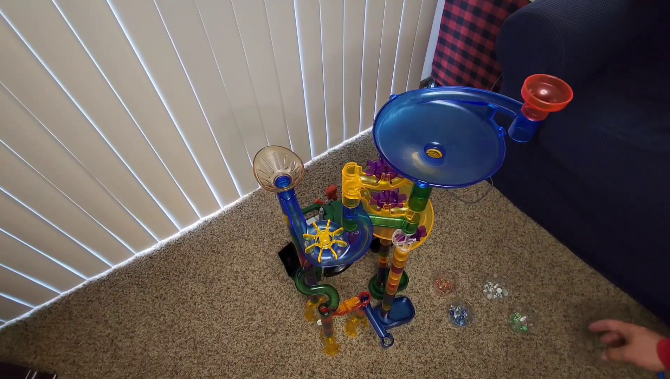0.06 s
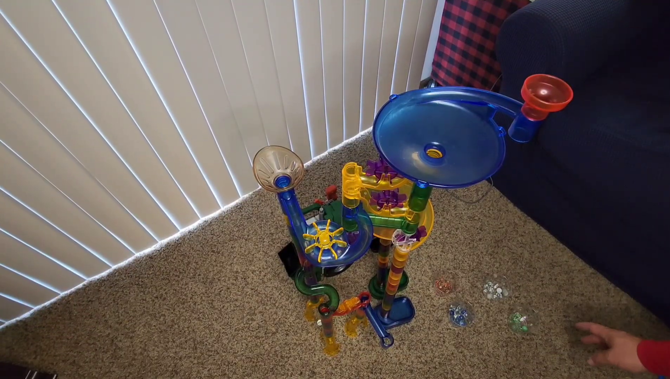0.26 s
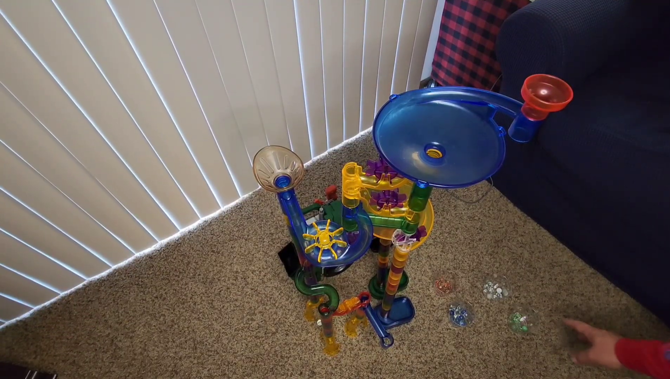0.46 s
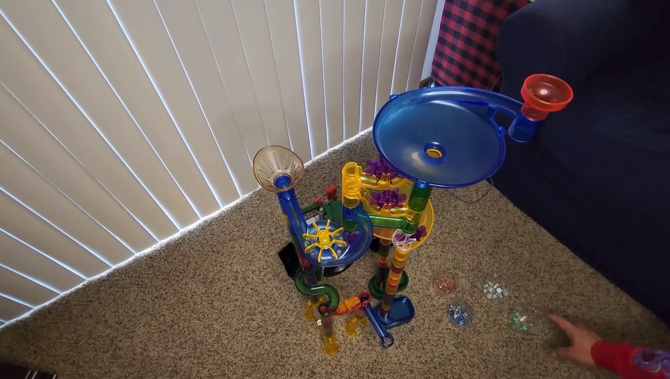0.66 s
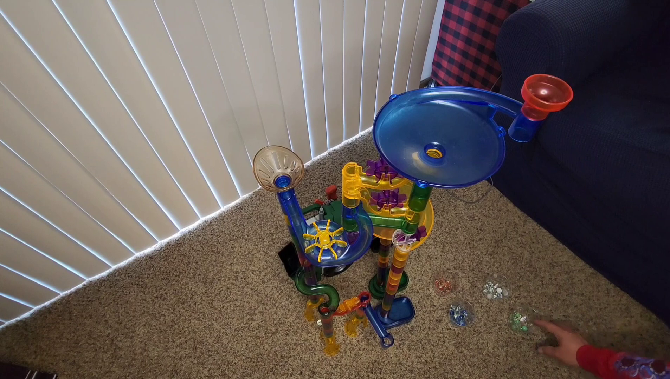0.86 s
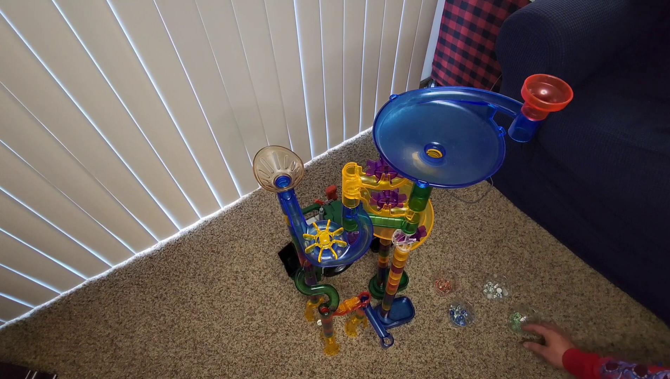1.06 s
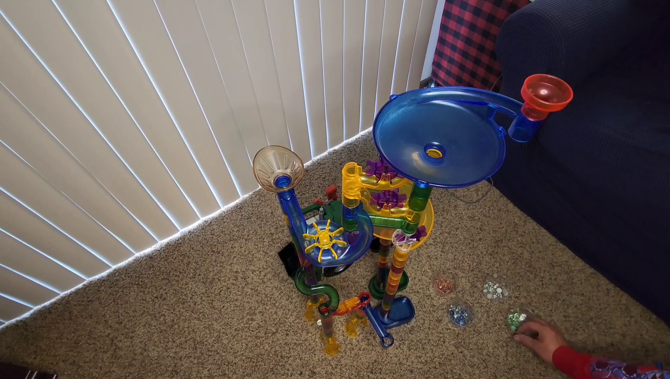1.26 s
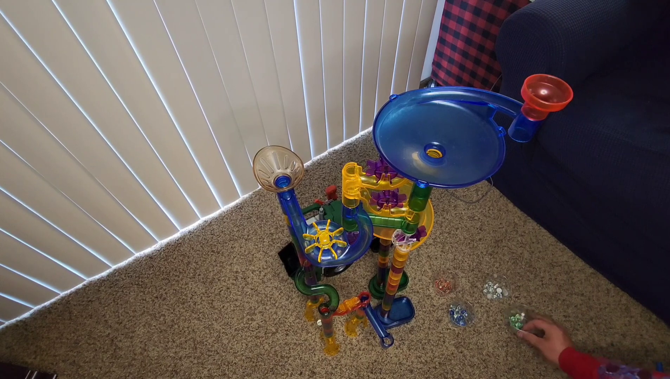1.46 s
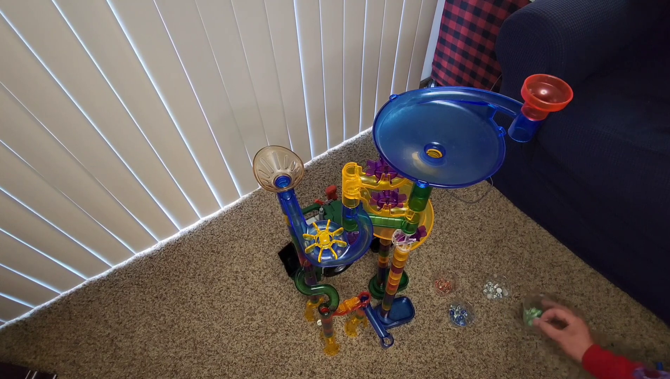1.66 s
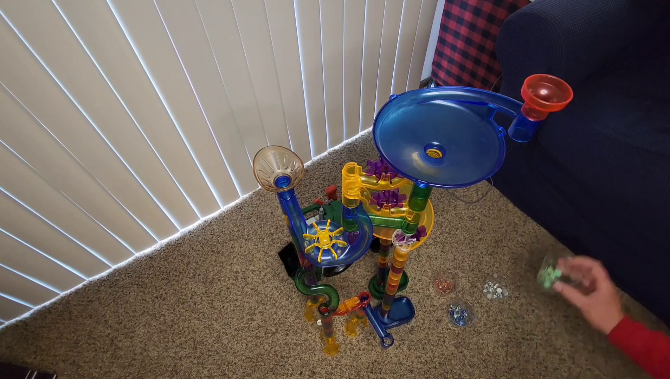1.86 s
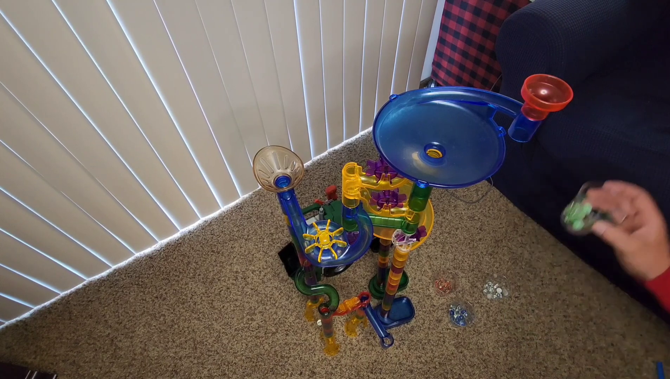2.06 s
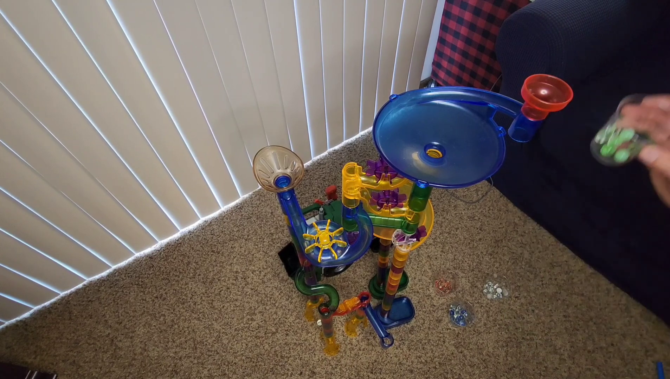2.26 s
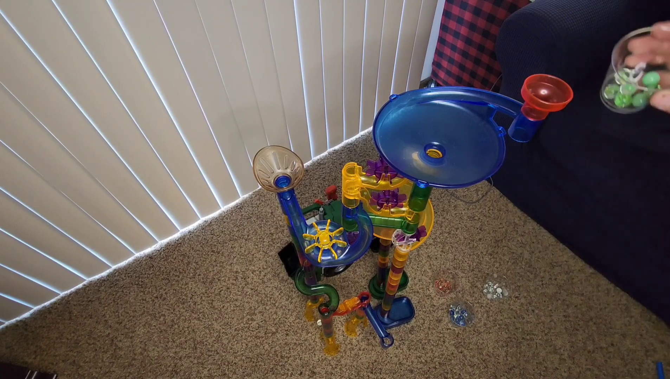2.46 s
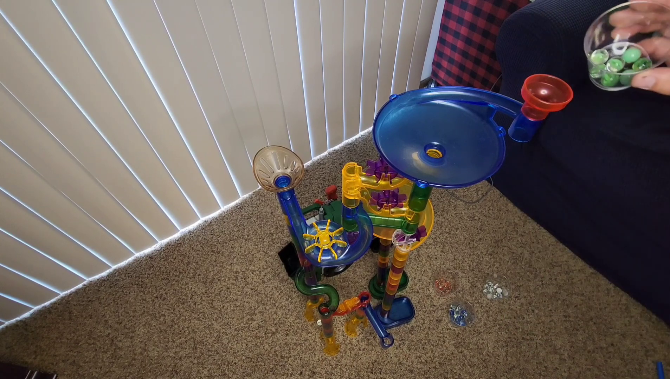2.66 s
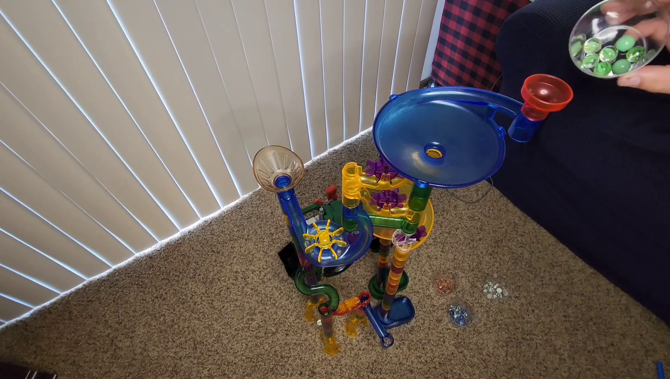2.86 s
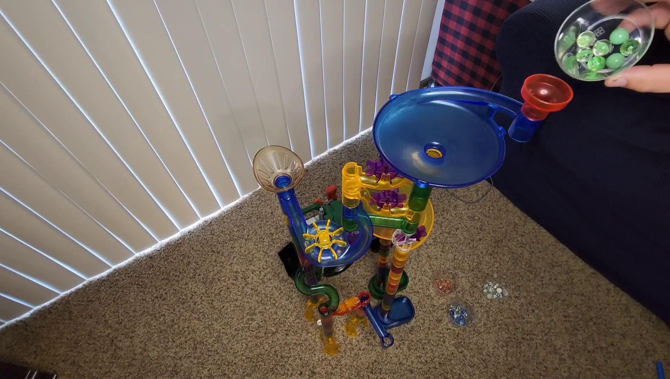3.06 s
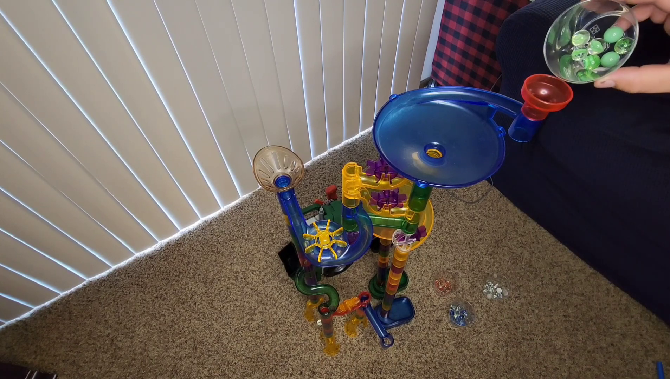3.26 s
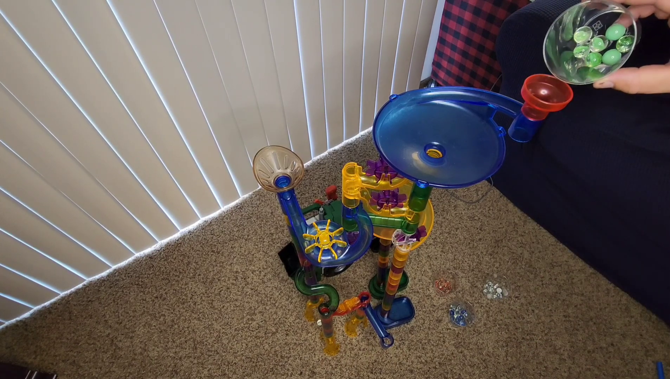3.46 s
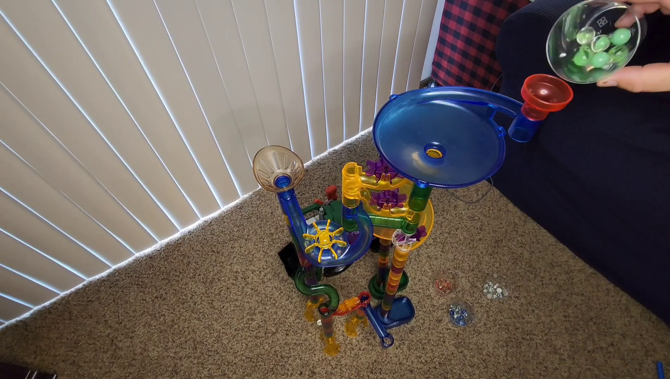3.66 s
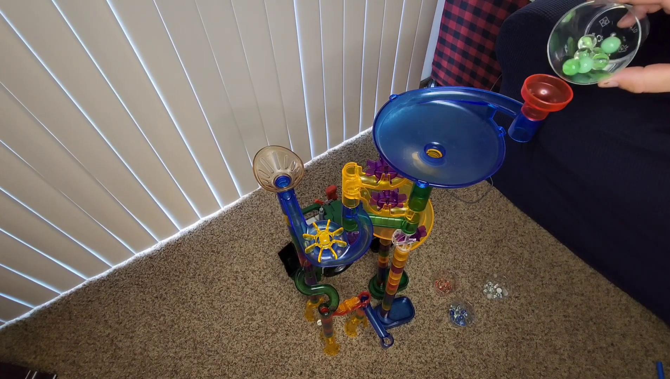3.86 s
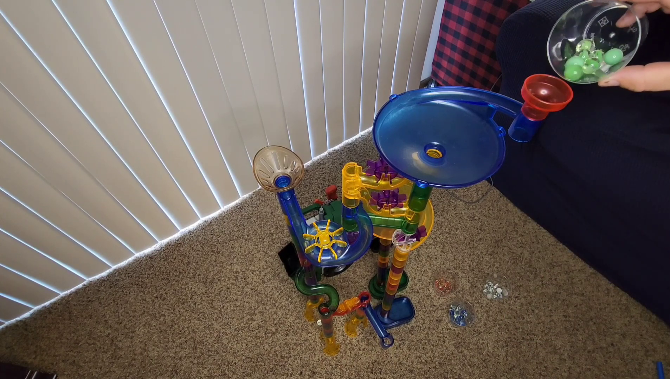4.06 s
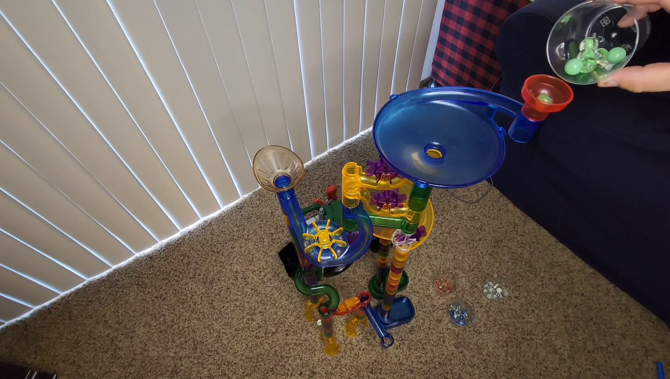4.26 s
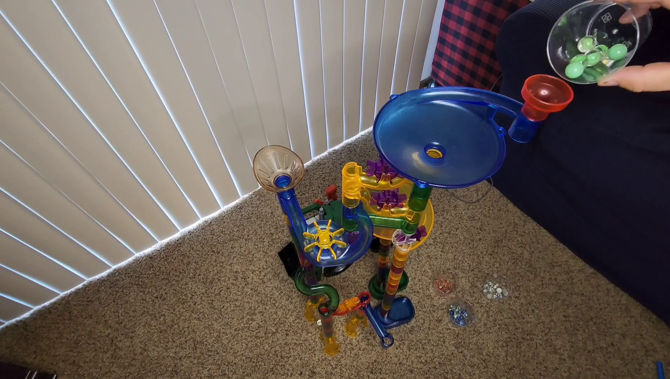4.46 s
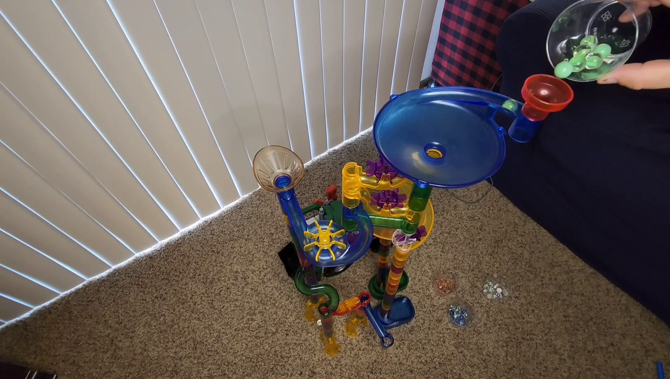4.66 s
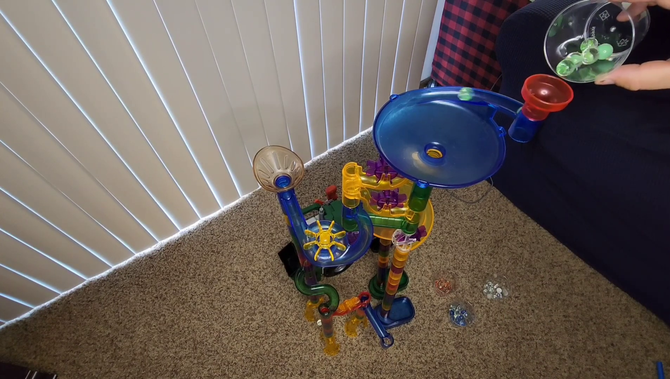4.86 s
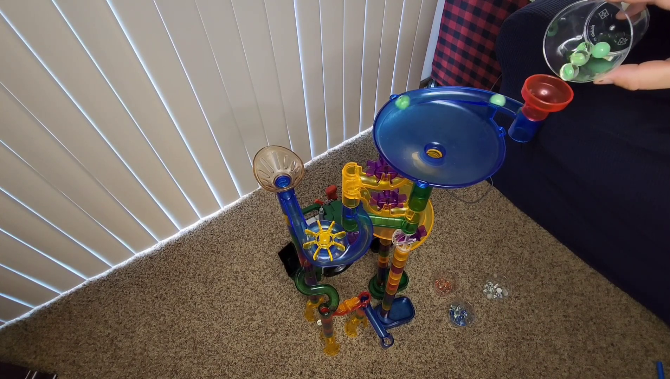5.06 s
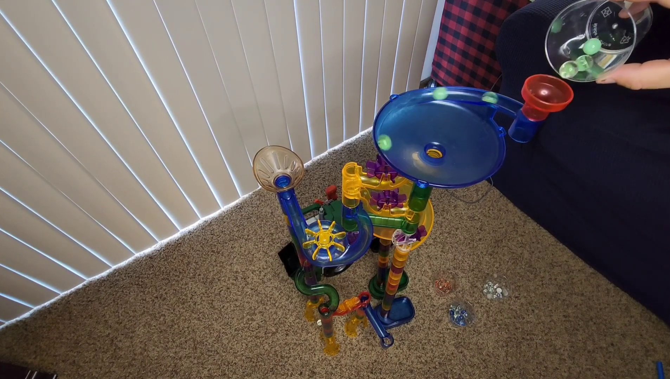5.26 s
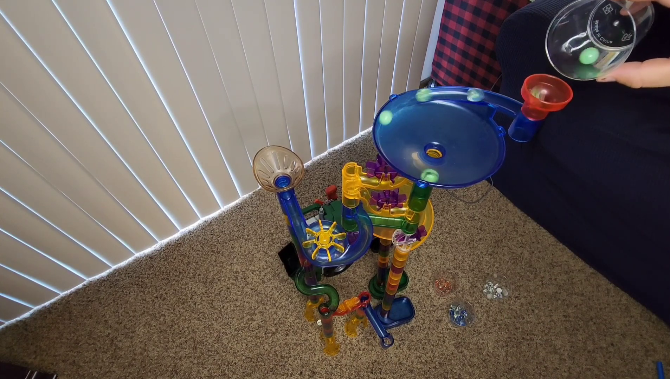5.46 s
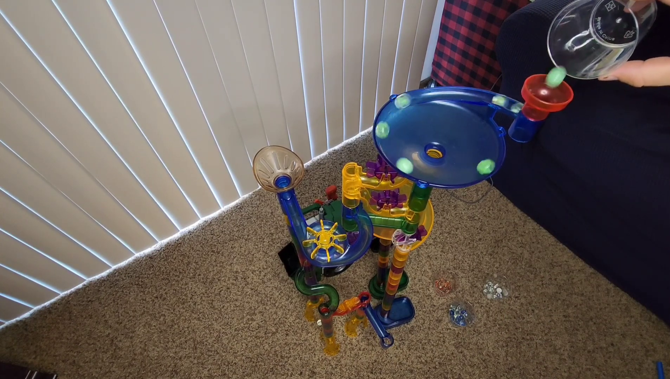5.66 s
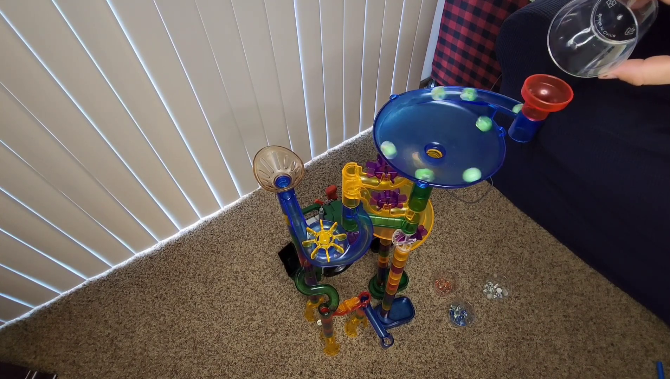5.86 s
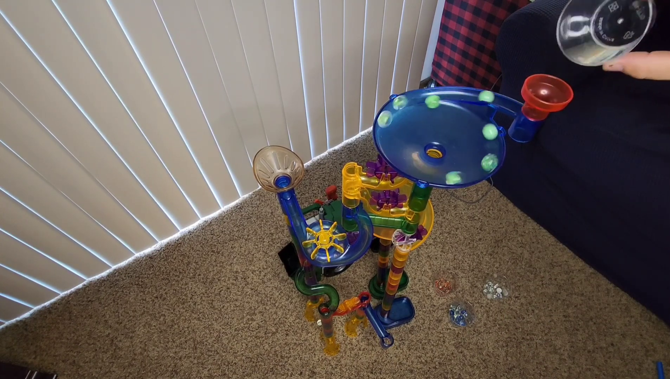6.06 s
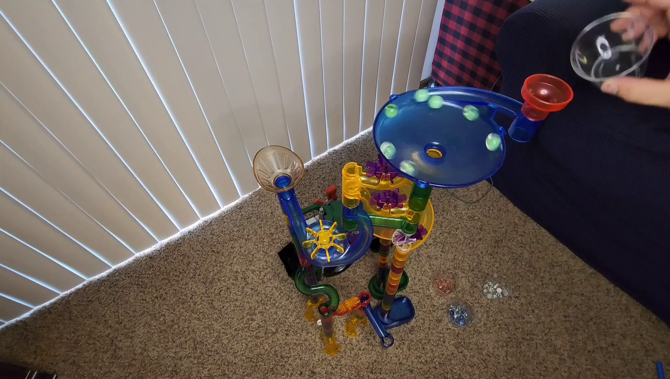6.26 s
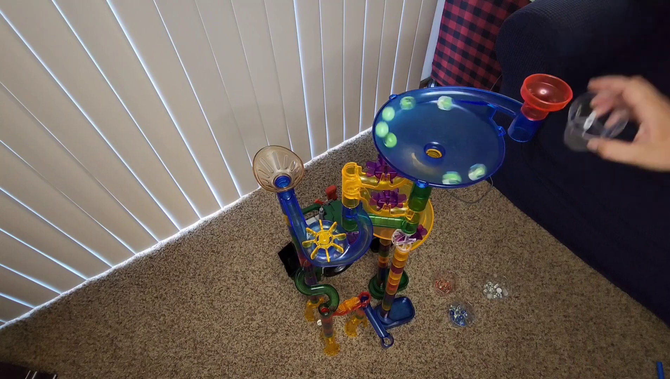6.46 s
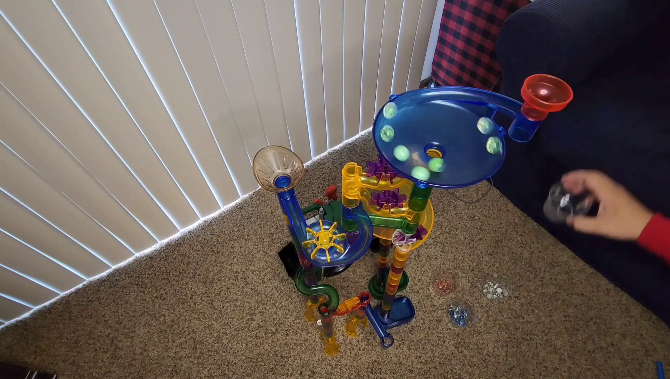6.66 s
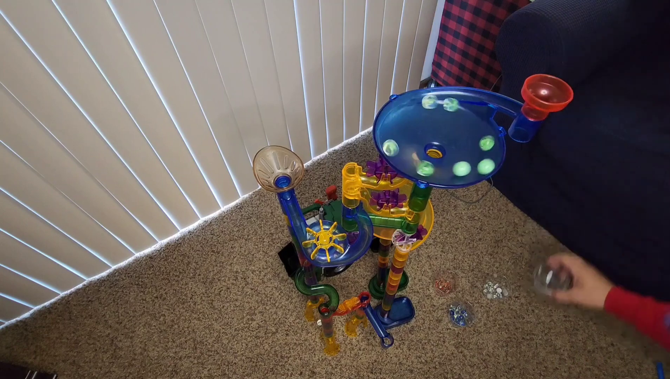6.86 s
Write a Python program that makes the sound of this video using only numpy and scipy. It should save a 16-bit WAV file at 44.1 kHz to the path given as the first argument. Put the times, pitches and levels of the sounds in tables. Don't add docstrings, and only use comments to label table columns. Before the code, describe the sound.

Quiet carpet rustle and a soft low floor bump come first, then small glassy rattles inside a thin plastic cup, growing louder as it rises. After a near-silent gap, marbles slide and knock sharply against the tilted cup, strike a hard plastic chute one after another, then in a dense rush. The clatter gives way to continuous hollow rolling in a funnel, still going at the end. Close stereo, short indoor reverberation.

```python
import sys
import numpy as np
from scipy import signal
from scipy.fft import rfft, irfft, next_fast_len
from scipy.io import wavfile
from scipy.ndimage import uniform_filter1d

SR = 44100
rng = np.random.default_rng(int(sys.argv[2]) if len(sys.argv) > 2 else 0)


def store_pcm(level_fs):
    pcm = np.round(np.clip(level_fs, -1, 1) * 32767).astype(np.int16)
    wavfile.write(sys.argv[1], SR, np.atleast_2d(pcm).T)


def ratio(d):
    e = np.asarray(d, float) / 20
    return 10 ** e


N = 305613

# start [t/s], length [t/s], level [level/dB], lower part [level/dB]
STROKES = [
    (0, 0.09, -49, -2),
    (0.186, 0.0057, -56.5, -7),
    (0.292, 0.016, -70, 12),
    (0.355, 0.099, -52.5, -2),
    (0.529, 0.28, -65, -8),
    (0.85, 0.2, -78, -5),
    (1.064, 0.016, -60, -5),
    (1.116, .06, -78, -6),
    (1.18, .02, -68, -10),
]
# [f/Hz], density [level/dB per Hz]
BRUSH_COLOUR = [(240, -29), (400, -5.5), (572, -13.5), (885, -19.5), (1230, -18), (2630, -16.5),
                (5200, -7.5), (7800, -9), (10000, -13.5), (15300, -17), (16500, -17.5)]
# start [t/s], length [t/s], level [level/dB]
SCRAPE = (.289, 0.014, -64.5)
# [f/Hz], width [f/Hz], [level/dB]
SCRAPE_RING = [(1720, 1200, 2.5), (3230, 900, -12)]
# start [t/s], length [t/s], [level/dB]
KNEES = [
    (.09, 0.093, -43),
    (0.51, 0.036, -37.5),
]
# [f/Hz], density [level/dB per Hz]
AIR = [(12, -20), (20, -1), (48, 1), (86, -6.5), (108, -7), (195, -8), (323, -7.5), (416, -20.5),
       (479, -24.5), (652, -21), (772, -28), (16500, -60.5)]
# [f/Hz], left-right likeness [0..1]
AIR_SAME = [(60, 0.93), (180, 0.91), (550, 0.29), (1650, -0.0), (4970, 0), (15000, 0.77)]
# [f/Hz], width [f/Hz], [level/dB]
HUM = [(39.2, 19, -73), (93, 8, -80), (118.2, 2.9, -63), (303.7, 12, -67.5)]

# [t/s], blow, low part, glassy part, chatter [level/dB]
SHIFTS = [(1.2, -42, -5.5, -5, 1), (1.2145, -34, -11, -10, 8), (1.2939, -34.5, -12, 0, -8),
          (1.328, -30, -12.5, -8, 0), (1.3853, -30.5, -9.5, -8, -10), (1.474, -37.5, -9, -1, -1),
          (1.5108, -29, -10, -3.5, -3), (1.6292, -40.5, -2.5, -40, -9), (1.6597, -31.5, -13.5, -1.5, -6),
          (1.694, -34.5, -5.5, -3.5, -11), (1.7135, -27.5, -13.5, -5.5, -9), (1.7406, -35, -6.5, -7, -13),
          (1.8, -44.5, -4.5, -0.5, -6), (1.8115, -42.5, -6, -2, -21), (1.8489, -50, -9, -2, -10),
          (1.8838, -33.5, -13, 1, 6), (1.9882, -51, 2.5, 8, -16),
          (2.1996, -27.5, -11, -3.5, 1.5), (2.221, -25.5, -18.5, -31, -14), (2.255, -43.5, -2, -33, -10),
          (2.295, -46, -7, -8, -9.5), (2.3462, -33, -8.5, 0, -13), (2.4107, -25.5, -13, 1, -5.5),
          (2.4456, -30.5, -9, -0.5, 11), (2.461, -27, -15, -7, -18), (2.5177, -21, -16, -5.5, -5.5),
          (2.5303, -17.5, -18, -22, -16.5), (2.5887, -26.5, -8, 4.5, -7.5), (2.6036, -22, -8.5, -10.5, -14),
          (2.62, -21.5, -12, -2.5, -11.5)]
# [t/s], blow, low part, glassy part, chatter [level/dB]
TIPS = [(3.612, -62, -8, -15, 6), (3.6315, -50.5, -6, -21, 11), (3.672, -43, -10, -14, 5),
        (3.687, -22, -14, -10, -6), (3.766, -33, -10, -13, -8), (3.772, -7, -14, -12, -16.5),
        (3.7882, -20, -13.5, -7, 4), (3.8137, -37, -1, -13, -22), (3.8428, -23.5, -8, -19, -9.5),
        (3.8768, -11.5, -16, -8, -7.5), (3.8875, -19, -5, -14, -18), (3.918, -20, -14.5, -0.5, -14),
        (3.947, -34, -10, -6, -12), (3.971, -39, -7, -20, -16), (3.9892, -17, -8.5, -2.5, -9),
        (4.0021, -16, -38, -10, -18), (4.0986, -29.5, -9.5, -6, -11), (4.139, -29.5, -14, -4, -20),
        (4.2378, -22, -24, -1.5, 15)]
# [t/s], blow, low part, glassy part, chatter [level/dB]
LANDINGS = [(4.2465, -15.5, 7.5, -1.5, -12), (4.3786, -36, 8.5, 3, 13), (4.3928, -34.5, 6.5, -6, 6),
            (4.4652, -29, -2, 0, -5), (4.4792, -33.5, 8, 4, -17), (4.5056, -7, -5.5, -7, -11),
            (4.559, -26, -2, -24, 5), (4.5661, -23.5, -2.5, -15, -8), (4.575, -24.5, -11, -3.5, 0.5),
            (4.5963, -29.5, -0.5, -19, -4.5), (4.647, -35.5, -0.5, -16, -9), (4.6962, -38.5, -22, 6, -6),
            (4.709, -44, -20, 0, -12), (4.7517, -44, -8, -15, -7), (4.772, -45, -1, -30, -15),
            (4.787, -39, -7, -12, -17), (4.795, -32, -33, 1, -23),
            (4.8209, -15.5, -6, -18, 4), (4.832, -22.5, -1, 11.5, -27), (4.8422, -9, -2, -5, -8),
         (4.8521, -17, 5, -13.5, -7), (4.8741, -20.5, -1, -4.5, -7), (4.9101, -22, -2, -28, -6.5),
         (4.9734, -45, 7, -2, 4), (5.009, -33.5, -24, 2.5, -25), (5.0406, -38, -7, -2, -14),
         (5.057, -38, 6.5, -29, -20), (5.094, -19, -8, -13, 7), (5.099, -5, -6, -7, -6.5),
         (5.1363, -16, 1.5, -7.5, -10), (5.1685, -17.5, -5, -16, -25), (5.224, -11.5, -4, 0.5, -11.5),
         (5.245, -11, -2.5, -3, -13), (5.258, -20, 7, 1, -7.5), (5.2787, -21, -8, -3, -13),
         (5.2904, -24.5, 2.5, -17, -11.5), (5.3043, -9.5, -6, -8.5, -13), (5.337, -17, 2.5, -40, -23),
            (5.426, -13, -10.5, -7, -5), (5.4338, -16.5, -5, -12, -13), (5.4454, -28, 8, 3, 3),
        (5.459, -4.5, -4, -5.5, -11), (5.5003, -27.5, 11, -24, -13), (5.5149, -12.5, -3.5, -13, -9),
        (5.524, -16, 2.5, 4.5, -9.5), (5.543, -17.5, 2.5, -10, -6), (5.549, -17, -2, -25, -24),
        (5.5539, -12.5, -1.5, -23, -24), (5.5748, -18.5, 0, -3.5, -18), (5.604, -16.5, 1.5, -7.5, -25),
        (5.6168, -23, -10, -1, -11), (5.6396, -9, -8.5, -5.5, -8), (5.672, -26.5, 7, -21, -6.5),
        (5.7746, -12.5, -2.5, -1.5, -7), (5.787, -20.5, 7, 2, -7.5), (5.8039, -7.5, -4.5, -2.5, -8.5),
        (5.8256, -31, 13, -31, -2), (5.8432, -11.5, -1, -38, -16), (5.8762, -21.5, 1.5, -12, -14)]
# [t/s], blow, chatter [level/dB]
TOUCHES = [(5.9467, -38, 0.5), (5.9678, -33.5, 12), (6.0267, -39, 3), (6.149, -38, -2), (6.187, -46, 0),
           (6.2038, -39, 2), (6.2318, -45, -2), (6.2843, -42, 9), (6.321, -35.5, 7), (6.3408, -40, 6),
           (6.3565, -36.5, 3), (6.387, -35.5, -11), (6.414, -36, 3), (6.431, -35, 3), (6.4912, -33.5, 6),
           (6.513, -32, 7), (6.5530, -34, 5), (6.6, -33.5, -7), (6.6492, -48, -2), (6.6925, -50, 2),
           (6.7075, -27.5, -10), (6.7329, -25.5, -5), (6.79, -37, 3), (6.8327, -35.5, 2),
           (6.8519, -40.5, 4), (6.911, -33.5, -3)]
# [t/s], [f/Hz]
SPOTS = [(1.2, 3700), (1.2145, 3800), (1.328, 5000), (1.474, 4120), (1.7135, 3730), (1.8838, 3700),
         (2.1996, 2700), (2.2207, 2600), (2.3462, 3870), (2.4105, 4200), (2.5181, 4000), (3.8428, 5140),
         (3.918, 7950), (3.9892, 3690), (4.2378, 4900), (4.2465, 1560), (4.5056, 5400), (4.559, 2450),
         (4.575, 6800), (4.6962, 7230), (4.787, 5000), (4.795, 7460), (4.832, 7000), (5.0397, 6800),
         (5.057, 4300), (5.224, 3300), (5.3371, 2570), (5.4449, 1500), (5.787, 3600), (5.8433, 2550),
         (5.3044, 5500), (5.459, 5390), (5.5238, 8800), (5.6398, 5400), (5.8041, 4500), (6.321, 7300),
         (6.387, 2200), (6.432, 4000), (6.553, 4000), (6.7075, 4500), (6.7324, 3900)]

# [t/s], [level/dB]
CARRIED = [(1.8, -110), (1.85, -74), (1.9, -61), (2.15, -68), (2.2, -55), (2.62, -84), (2.68, -52),
           (2.85, -85), (2.95, -110)]
# [t/s], [level/dB]
TILTED = [(3.76, -95), (3.8, -42.5), (3.87, -48), (3.95, -55), (4.0, -38), (4.06, -55.5), (4.12, -63),
          (4.2, -71), (4.24, -81)]
# [t/s], [level/dB]
TILTED_LOW = [(3.66, -96), (3.7, -59), (3.76, -48), (3.81, -39), (3.88, -68), (4.0, -43.5), (4.05, -54),
              (4.2, -74), (4.24, -85)]
# [t/s], [level/dB]
ROLL = [(4.3, -36.5), (4.42, -55.5), (4.7, -61.5), (4.83, -46.5), (4.95, -41), (5, -43), (5.14, -34.5),
        (5.23, -38), (5.36, -38), (5.48, -28.5), (5.7, -33), (5.92, -33), (6.0, -32.5), (6.25, -33),
        (6.45, -32), (6.65, -34.5), (6.75, -33), (6.93, -34)]

# [f/Hz], width [f/Hz], [level/dB]
WALL_UPRIGHT = [(2026, 150, 0.0022)]
# [f/Hz], width [f/Hz], [level/dB]
WALL_TILTED = [(3615, 150, -0.8)]
# [f/Hz], width [f/Hz], [level/dB]
WALL_LOW = [(1704, 61, -0.5)]
# [f/Hz], width [f/Hz], [level/dB]
CUP = [(1120, 40, -7.5), (1820, 110, -12), (3750, 110, -10), (4765, 220, -9), (5400, 84, -1.5),
       (6500, 200, -26.5), (7220, 220, -6), (8750, 750, -10)]
# [f/Hz], density [level/dB per Hz]
CUP_COLOUR = [(180, -32.5), (300, -9.5), (355, -11), (1190, -6), (2170, -6), (3650, -5), (7380, 1.5),
              (14900, -1.5), (16500, -22)]
# [f/Hz], width [f/Hz], [level/dB]
CHUTE = [(403, 32, -12), (737, 28, -4.5), (1205, 65, -3), (1460, 48, -5), (1706, 110, -2.5), (2120, 81, -3),
         (2320, 90, 0.5), (2870, 170, 8.5), (3610, 230, 11), (4250, 130, 0.5), (5420, 77, 11),
         (6900, 230, -8)]
# [f/Hz], density [level/dB per Hz]
CHUTE_COLOUR = [(150, -27.5), (250, -20.5), (400, -11), (750, -13), (1490, -4.5), (2010, -4.5), (2910, 8.5),
                (5400, 5), (7900, -6.5), (12500, -14), (15300, -13), (16500, -37)]
# [f/Hz], width [f/Hz], [level/dB]
FUNNEL = [(406, 17, -12), (720, 286, -7.5), (998, 74, -1.5), (1118, 40, 1.5), (1216, 34, -1),
          (1248, 64, 3.5), (1497, 79, 3.5), (1545, 70, -1), (1607, 45, -2.5), (2150, 150, -10),
          (2900, 83, -17)]
# [f/Hz], density [level/dB per Hz]
FUNNEL_COLOUR = [(120, -53), (200, -18), (403, -14), (909, -13), (1050, -5), (1500, -0.5), (1780, -5.5),
                 (2960, -8), (7460, -27.5), (11500, -42), (15000, -43), (16500, -62)]
# [f/Hz], density [level/dB per Hz]
TOUCH_COLOUR = [(300, -15), (1200, -5.5), (2200, 1), (4300, 1), (7500, 1), (11000, -11), (15000, -15),
                (16500, -30)]

# [f/Hz], left-right likeness [0..1]
PORT_SAME = [(700, 1), (2000, 0.78), (5000, 0.086), (12000, 0.55)]
# [f/Hz], phase [rad]
SIDE_LAG = [(500, .2), (1300, 1.8), (3000, 4.2), (5500, 6.6), (7000, 6.2)]
# [f/Hz], phase [rad]
FRONT_LAG = [(1000, .2), (2150, 1.4), (3000, .8), (4000, 2.5), (6200, 6.3)]
# [f/Hz], t60 [t/s]
ROOM = [(300, 0.59), (800, 0.29), (2100, 0.23), (5500, 0.32), (12000, 0.27)]
# [f/Hz], left-right likeness [0..1]
ROOM_SAME = [(300, 0.83), (1000, 0.26), (2500, 0.52), (5000, 0.057), (9000, 0.88), (15000, .6)]
# [f/Hz], [level/dB]
MIC = [(5800, 0), (6700, 0), (7500, 1.5), (8500, 0), (11600, -1), (14500, -1.5), (15800, 3)]

AIR_DB = -54.5
STROKE_DB_PER_S = (1100, 32, 280)
KNEE_DB_PER_S = (300, 100, 104)
CUP_DULL_HZ, CUP_GLASSY_HZ, CUP_HARD_HZ = 3400, 7710, 5750
CHUTE_SOFT_HZ, CHUTE_HARD_HZ, CHUTE_THUD_HZ = 2715, 5200, 1613
GLASSY_FROM_DB, CUP_HARD_FROM_DB = -10, -9
CHUTE_HARD_FROM_DB, THUD_FROM_DB = -12.2, 7.2
TOUCH_LOW_DB, TOUCH_GLASS_DB = -1, -13
EDGE_HZ, TOP_HZ = 15950, 16900


def evened(x):
    return x / np.sqrt(np.mean(x ** 2) + 1e-20)


def read(points, hz):
    f, value = np.transpose(points)
    return np.interp(np.log(hz + 1), np.log(f + 1), value)


def follow(rows):
    t, level_db = np.transpose(rows)
    return np.interp(np.arange(N) / SR, t, level_db)


def noise(colour, same, size=1024, patchy_db=4.5):
    frames, hz = 4 * N // size + 5, np.fft.rfftfreq(size, 1 / SR)
    a, b, c, d, patches = rng.standard_normal((frames, size // 2 + 1, 5)).T
    patches = uniform_filter1d(patches, size=10, axis=0)
    patches = evened(uniform_filter1d(patches, size=10, axis=1))
    same = np.clip(read(same, hz), -1, 1)[:, None]
    left = a + 1j * b
    right = same * left + np.sqrt(1 - same ** 2) * (c + 1j * d)
    z = np.array([left, right])
    z *= ratio(read(colour, hz)[:, None] + patchy_db * patches)
    x = signal.istft(z, nperseg=size, noverlap=3 * size // 4)[1]
    return evened(x[:, :N])


def resonate(x, hz, width_hz):
    turn = np.exp(2j * np.pi * hz * np.arange(N) / SR)
    r = np.exp(-np.pi * width_hz / SR)
    return 2 * (turn * signal.lfilter([1 - r], [1, -r], x / turn)).real


def stroke(start_s, length_s, db, rise, swell, fall):
    t = np.arange(N) / SR - start_s
    before_s, after_s = np.maximum(-t, 0), np.maximum(t - length_s, 0)
    left_s = length_s - np.clip(t, 0, length_s)
    return ratio(db - rise * before_s - swell * left_s - fall * after_s)


def brushing():
    hiss = noise(BRUSH_COLOUR, [(500, 0.13), (8000, 0.42)], size=256, patchy_db=1.0)
    lower = signal.sosfilt(signal.butter(3, 3500, fs=SR, output="sos"), hiss)
    upper, lower = evened(hiss - lower), evened(lower)
    grit = ratio(1.0 * evened(uniform_filter1d(rng.standard_normal(N), size=90)))
    scrape = 0
    for hz, width_hz, db in SCRAPE_RING:
        once = resonate(lower[1] * grit, hz, width_hz)
        scrape = scrape + ratio(db) * evened(resonate(once, hz, width_hz))
    out = scrape * stroke(*SCRAPE, *STROKE_DB_PER_S)
    for start_s, length_s, db, lower_db in STROKES:
        gain = stroke(start_s, length_s, db, *STROKE_DB_PER_S) * grit / 1.02
        out = out + gain * (upper + ratio(lower_db) * lower)
    return out


def room_tone():
    hum = sum(ratio(db) * evened(resonate(rng.standard_normal(N), hz, width_hz)) for hz, width_hz, db in HUM)
    sway = sum(stroke(*row, *KNEE_DB_PER_S) for row in KNEES)
    beat = np.sin(2 * np.pi * 26 * np.arange(N) / SR + 0.42) * np.sqrt(2)
    air = ratio(AIR_DB - 2) * noise(AIR, AIR_SAME, size=2048, patchy_db=2.45)
    return air + hum + sway * ratio(-2.5) * beat


def causal(gain):
    cep = irfft(np.log(np.maximum(gain, 1e-5)))
    half = len(cep) // 2
    cep[1:half] *= 2
    cep[half + 1:] = 0
    return irfft(np.exp(rfft(cep)))


def body(modes, colour, hz, modes_db, shift_db=0, detune=1):
    f, width_hz, db = np.transpose(modes)
    lift_db = db - read(colour, f) + modes_db + shift_db
    off = (hz - (f * detune)[:, None]) / (width_hz[:, None] / 2)
    peaks = ratio(lift_db)[:, None] / np.sqrt(1 + off ** 2)
    return ratio(read(colour, hz)) * np.sqrt(1 + (peaks ** 2).sum(0))


def paired(forces):
    left, right = rfft(forces)
    same = np.clip(read(PORT_SAME, np.fft.rfftfreq(forces.shape[1], 1 / SR)), 0, 1)
    return np.array([same * right + np.sqrt(1 - same ** 2) * left, right])


def blows(rows, ring_of, modes, colour, modes_db, glass_hz, per_s, crack_s, t60_s, size=8192):
    out = np.zeros((2, N + size))
    hz, t = np.fft.rfftfreq(size, 1 / SR), np.arange(size) / SR
    low = 1 / (1 + (hz / 2000) ** 4)
    high = 1 / (1 + (glass_hz / (hz + 1)) ** 4)
    lead = 64
    for s, db, low_db, glass_db, chatter_db in rows:
        spot_db, detune = np.clip(rng.standard_normal((2, len(modes))), -1.5, 1.5) * [[3.5], [.017]]
        chance = rng.random(size)
        sign, crack = rng.standard_normal((2, 2, size))
        decay_db = chatter_db - 60 * (t / max(t60_s, .004)) ** 2.08
        chatter = ratio(decay_db) * sign * (chance < per_s / SR)
        chatter = paired(chatter * (1 - np.exp(-t / 0.0004)))
        push = chatter + 2.0
        strike = chatter + paired(0.66 * crack * np.exp(-t / crack_s))

        own = [f for at_s, f in SPOTS if abs(at_s - s) < .003]
        ring_hz = own[0] if own else ring_of(db, low_db, glass_db)
        ring_hz = ring_hz * (1 + 2 * detune[0])
        favoured = 1 + 1.9 / (1 + ((hz - ring_hz) / (.075 * ring_hz)) ** 2)
        ring = rfft(causal(favoured * body(modes, colour, hz, modes_db, spot_db, 1 + detune)))

        at = round(s * SR) - lead
        parts = ((push, low, low_db + 7.0), (strike, 1 - low - high, 0), (strike, high, glass_db))
        for force, part, part_db in parts:
            wave = np.roll(irfft(force * ring * part), lead, axis=1)
            loudest = np.sqrt(uniform_filter1d(wave[1] ** 2, size=176).max())
            out[:, at:at + size] += ratio(db + part_db - 12) * wave / loudest
    return out[:, :N]


def cup_ring(db, low_db, glass_db):
    if db > CUP_HARD_FROM_DB:
        return CUP_HARD_HZ
    return CUP_GLASSY_HZ if glass_db > GLASSY_FROM_DB else CUP_DULL_HZ


def swirl(level, wall):
    rub = rng.standard_normal(N)
    rough = evened(uniform_filter1d(rng.standard_normal(N), size=300))
    rub = rub * ratio(5.0 * rough)
    sing = sum(ratio(db) * evened(resonate(rub, hz, width_hz)) for hz, width_hz, db in wall)
    return ratio(follow(level)) * sing


def lifted_cup():
    knocks = blows(SHIFTS, cup_ring, CUP, CUP_COLOUR, modes_db=2.5, glass_hz=4620,
                   per_s=9000, crack_s=0.00051, t60_s=0.056)
    return knocks + swirl(CARRIED, WALL_UPRIGHT)


def tipped_cup():
    knocks = blows(TIPS, cup_ring, CUP, CUP_COLOUR, modes_db=8.1, glass_hz=7500,
                   per_s=5000, crack_s=0.0011, t60_s=0.057)
    return knocks + swirl(TILTED, WALL_TILTED) + swirl(TILTED_LOW, WALL_LOW)


def chute_ring(db, low_db, glass_db):
    if low_db > THUD_FROM_DB:
        return CHUTE_THUD_HZ
    return CHUTE_HARD_HZ if db > CHUTE_HARD_FROM_DB else CHUTE_SOFT_HZ


def chute_landings():
    out = blows(LANDINGS, chute_ring, CHUTE, CHUTE_COLOUR, modes_db=2.2, glass_hz=9700,
                per_s=1800, crack_s=0.0013, t60_s=0.039)
    shake = resonate(resonate(abs(out[1]), 96, 30), 96, 30)
    return out + ratio(-65.0) * evened(shake)


def funnel_rolling(per_s=4500, lump_db=2.1, throb_db=1.0):
    lumps = np.minimum(rng.exponential(1, N), 5)
    size = ratio(lump_db * lumps) * (rng.random(N) < per_s / SR)
    taps = irfft(paired(size * rng.choice([-1, 1], (2, N))), N)
    throb = uniform_filter1d(rng.standard_normal(N), size=500)
    throb = evened(uniform_filter1d(throb, size=500))
    ring = causal(body(FUNNEL, FUNNEL_COLOUR, np.fft.rfftfreq(8192, 1 / SR), 6.9))
    rumble = evened(signal.oaconvolve(taps, ring[None, :4096])[:, :N])
    fade = np.clip((np.arange(N) / SR - ROLL[0][0]) / 0.067, 0, 1)
    return rumble * ratio(follow(ROLL) + throb_db * throb - 2.5) * fade


def funnel_touches():
    rows = [(s, db, TOUCH_LOW_DB, TOUCH_GLASS_DB, chatter_db) for s, db, chatter_db in TOUCHES]
    return blows(rows, chute_ring, CHUTE, TOUCH_COLOUR, modes_db=-9.0, glass_hz=6300,
                 per_s=3500, crack_s=0.00018, t60_s=0.017, size=4096)


def heard(x, lag, pan_db, wet_db):
    taps = np.zeros((2, SR // 2))
    at = np.arange(40, SR // 2 - 20, 20) + rng.integers(0, 20, (2, (SR // 2 - 41) // 20))
    np.put_along_axis(taps, at, rng.choice([-1., 1.], at.shape), 1)
    hz, t, z = signal.stft(taps, SR, nperseg=256)
    same = np.clip(read(ROOM_SAME, hz), 0, 1)[:, None]
    z[0] = same * z[1] + np.sqrt(1 - same ** 2) * z[0]
    t60_s = np.maximum(read(ROOM, hz), .05)[:, None]
    tail = signal.istft(z * ratio(-60 * t / t60_s), SR, nperseg=256)[1]
    tail = tail / np.linalg.norm(tail[0])

    size = next_fast_len(N)
    lag_rad = read(lag, np.fft.rfftfreq(size, 1 / SR))
    late = irfft(rfft(x[0], size) * np.exp(-1j * lag_rad), size)[:N]
    direct = np.array([late * ratio(pan_db / 2), x[1] / ratio(pan_db / 2)])
    return direct + ratio(wet_db) * signal.fftconvolve(x[1:], tail, axes=1)[:, :N]


def scene():
    lifted, tipped = lifted_cup(), tipped_cup()
    chute = chute_landings()
    funnel = funnel_rolling() + funnel_touches()
    cup = heard(lifted, SIDE_LAG, pan_db=-2.5, wet_db=-5.5)
    cup += heard(tipped, SIDE_LAG, pan_db=-2.0, wet_db=-6.5)
    track = heard(chute, FRONT_LAG, pan_db=-0.87, wet_db=-5.5)
    track += heard(funnel, FRONT_LAG, pan_db=0.14, wet_db=-6.0)
    return cup + track + brushing() + room_tone()


def roll_off(x):
    return signal.sosfilt(signal.butter(12, 16980, fs=SR, output="sos"), x)


def record(dry):
    size = next_fast_len(N)
    hz = np.fft.rfftfreq(size, 1 / SR)
    z = rfft(1.2 * np.tanh(dry / 1.2), size) * ratio(read(MIC, hz))
    under = np.clip((EDGE_HZ - hz) / 250, 0, 1) ** 2
    main = irfft(z * under, size)[:, :N]
    top = irfft(z * (1 - under) * (hz < TOP_HZ), size)[:, :N]
    power = (main ** 2).mean(0)
    attack = uniform_filter1d(power, size=400) > 2.0 * uniform_filter1d(power, size=2500)
    mix = main + ratio(-1.0) * top * uniform_filter1d(attack * 1., size=200)
    return roll_off(mix)


dry = scene()
out = record(dry)
store_pcm(out)
```